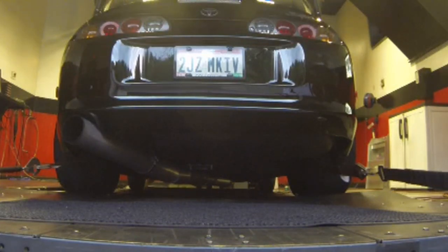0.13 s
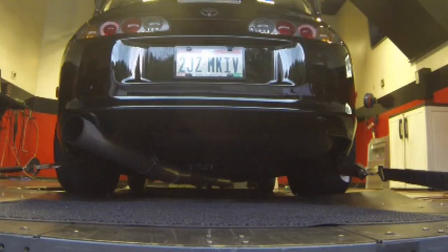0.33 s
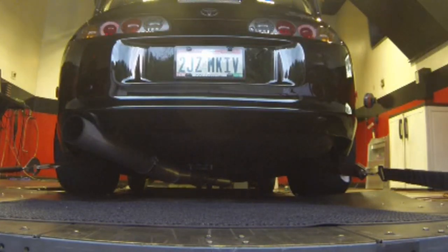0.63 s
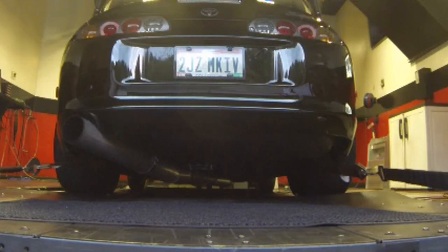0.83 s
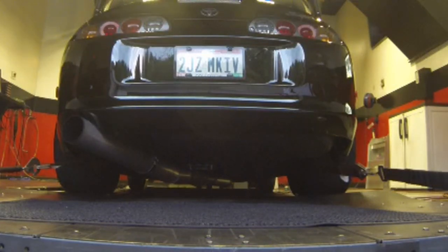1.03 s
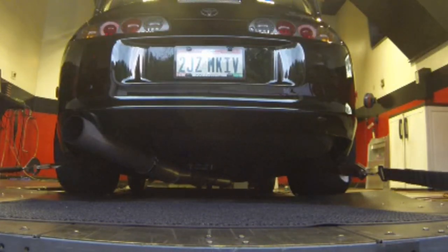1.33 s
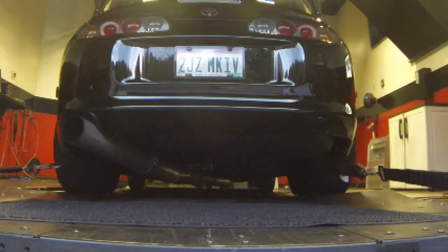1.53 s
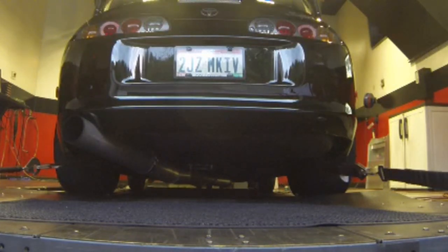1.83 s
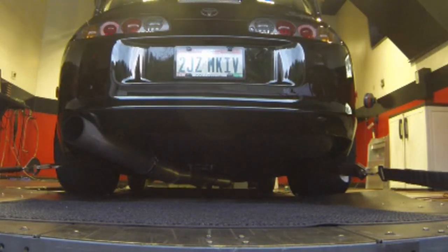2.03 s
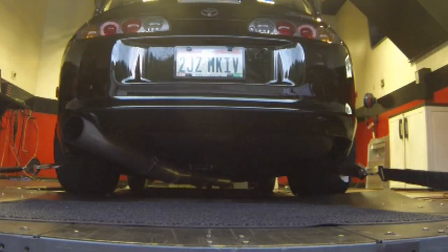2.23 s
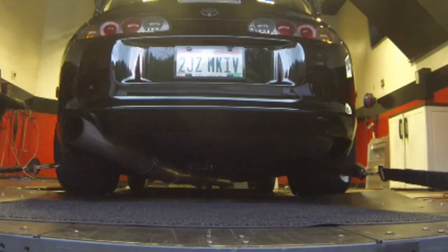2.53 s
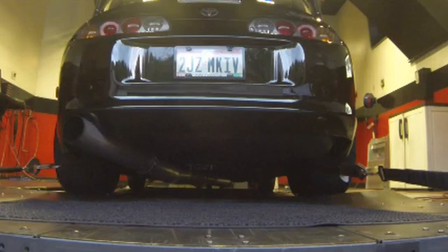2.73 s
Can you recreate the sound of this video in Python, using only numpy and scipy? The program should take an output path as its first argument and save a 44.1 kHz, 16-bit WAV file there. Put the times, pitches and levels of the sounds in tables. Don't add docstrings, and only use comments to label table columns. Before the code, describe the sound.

A tuned car engine, miked close behind its tailpipe in an echoing workshop, lopes in a deep, uneven burble with soft thumps and pops until about 1 s. It climbs from 1.2 to 1.6 s, holds a hum, stumbles near 1.9, then surges from 2.05. Sharp backfires crackle at 2.3-2.45 s before a rasping, hissing, overloaded scream lasts to the end. Rollers rumble and a fan hums faintly.

```python
import sys
import numpy as np
from scipy import signal
from scipy.fft import rfft, irfft, next_fast_len
from scipy.io import wavfile

SR = 44100
rng = np.random.default_rng(int(sys.argv[2]) if len(sys.argv) > 2 else 0)


def gain_from_decibels(decibels):
    exponent = np.asarray(decibels, float) / 20
    return 10 ** exponent


def bounce(signal):
    frames = np.transpose(np.atleast_2d(signal))
    limited = np.clip(frames, -1, 1)
    pcm = np.round(limited * 32767).astype(np.int16)
    wavfile.write(sys.argv[1], SR, pcm)


N = 127890

# t/s, firings per second f/Hz
FIRING_RATE = [(0.0, 58.1), (.35, 59.8), (.7, 59.7), (.9, 65), (1.2, 72.8), (1.298, 83.7), (1.398, 114.5),
               (1.468, 130.5), (1.55, 139), (1.61, 149.5), (1.76, 150), (1.82, 144.5), (1.96, 143.5),
               (2.05, 155), (2.26, 248), (2.39, 264), (2.5, 240.4), (2.9, 238.1)]
# f/Hz, level/dB
GAS_COLOUR = [(300, -7.5), (500, -1.5), (1000, -12.5), (1400, -13.5), (3100, -22.5), (6000, -41.5),
              (10000, -53), (15500, -95.5)]


def rms_one(x):
    return x / np.sqrt(np.mean(x ** 2) + 1e-20)


def in_time(rows):
    s, *columns = np.transpose(rows)
    return [np.interp(np.arange(N) / SR, s, column) for column in columns]


def bump(s, length):
    return np.exp(-((np.arange(N) / SR - s) / length) ** 2)


def clicks(rows):
    out = np.zeros(N)
    for s, db in rows:
        out[int(s * SR)] = gain_from_decibels(db)
    return out


def drift(rate):
    r = np.exp(-80 * np.pi * rate / SR)
    noise = rng.standard_normal(N // 40 + 2002)
    slow = signal.lfilter([1], [1, -2 * r, r * r], noise)[2000:]
    return np.interp(np.arange(N) / 40, np.arange(len(slow)), rms_one(slow - slow.mean()))


def resonate(x, peaks):
    out = 0
    for k, (hz, width, db) in enumerate(peaks):
        r = np.exp(-np.pi * width / SR)
        drive = np.array([1, 0, -1]) * (1 - r * r) / 2
        ringing = [1, -2 * r * np.cos(2 * np.pi * hz / SR), r * r]
        out = out + (-1) ** k * gain_from_decibels(db) * signal.lfilter(drive, ringing, x + 1e-18)
    return out


def banded(spectrum, patchy_db, tilt_db=0):
    out, together = 0, drift(8.0)
    edges = 22 * 2 ** np.arange(0, 9.6, .5)
    white = rng.standard_normal((2, N))
    f, d = np.transpose(spectrum)
    for k, (low, high) in enumerate(zip(edges, edges[1:])):
        hz = np.sqrt(low * high)
        db = np.interp(np.log(hz), np.log(f), d, left=-60, right=-90)
        sos = signal.butter(2, [low, high], "band", fs=SR, output="sos")
        band = signal.sosfilt(sos, white[k % 2])
        flicker_db = patchy_db * (together + 0.53 * drift(17.0))
        out = out + band * gain_from_decibels(db + tilt_db * np.log2(hz / 2000) + flicker_db)
    return rms_one(out)


def firing():
    # t/s, spread of strength level/dB, spread of timing/cycles
    unevenness = [(0, 1, .005), (.55, 1.4, .008), (.65, 3.5, .04), (.9, 3, .035), (1.05, 2.5, .02),
                  (1.3, 1.2, .012), (1.45, .8, .014), (1.6, .4, .018), (1.75, 1, .02), (1.88, 3, .035),
                  (1.96, .6, .005), (2.06, .6, .008), (2.12, 1.5, .014), (2.25, 1.3, .012), (2.3, 2, .12),
                  (2.34, 7, .25), (2.43, 6, .2), (2.47, 1.3, .008), (2.9, .7, .004)]
    cylinder_levels = [0, .5, -.3, -.6, .2, .4]
    # t/s, level/dB between neighbours
    alternation = [(0, -0.5), (1.72, -1.5), (1.85, 2.5), (1.94, 1.5), (1.98, -1), (2.9, 2)]
    spread_db, late = in_time(unevenness)
    turn = 1 - 0.2086 + np.cumsum(in_time(FIRING_RATE)[0]) / SR
    chance = rng.standard_normal((int(turn[-1]) + 3, 2))
    number = np.arange(len(chance))
    turn = turn + late * np.interp(turn, number, chance[:, 0])
    cylinder_db = np.interp(turn, number, np.resize(cylinder_levels, len(chance)))
    alternate_db = in_time(alternation)[0] * np.cos(np.pi * turn)
    chance_db = spread_db * np.interp(turn, number, chance[:, 1])
    return turn, gain_from_decibels(cylinder_db + alternate_db + chance_db)


def pulses(turn, strength, sharp):
    mean = np.i0(sharp)
    spread = np.sqrt(np.i0(2 * sharp) - mean ** 2)
    return -(strength * np.exp(sharp * np.cos(2 * np.pi * turn)) - mean) / spread


def push(turn, strength):
    # t/s, level/dB, sharpness (no unit)
    push_curve = [(0, -16.5, 3.8), (.35, -21, 8.6), (.62, -17.5, 5.8), (.82, -17.5, 5.2), (1.0, -15.5, 2.2),
                  (1.2, -11, 8.8), (1.32, -12, 1), (1.42, -15.5, 7.7), (1.56, -14.5, 1.8), (1.7, -18, 5.5),
                  (1.8, -21.5, 1.4), (1.97, -11.5, 2.2), (2.07, -14.5, 6.7), (2.15, -14, 21.4),
                  (2.25, -17.5, 2.8), (2.31, -20, 1.7), (2.5, -29, 9.6), (2.9, -21.5, 8)]
    db, sharp = in_time(push_curve)
    return gain_from_decibels(db) * pulses(turn, strength, np.clip(sharp, .2, 40))


def crack(turn, strength):
    # t/s, muffler level/dB, pipe level/dB
    ring_curve = [(0, -6.5, -51), (.14, -11, -61), (.26, -11.5, -55.5), (.37, -17, -47), (.48, -10.5, -36),
                  (.6, -16, -32), (.8, -18.5, -77), (1.0, -17.5, -35.5), (1.3, -33.5, -29),
                  (1.48, -28, -28), (1.65, -5, -25.5), (1.85, -18.5, -26.5), (2.0, -40, -24.5),
                  (2.2, -27, -21.5), (2.3, -38, -22), (2.45, -8.5, -23.5), (2.55, -36, -10),
                  (2.9, -53, -10)]
    # f/Hz, width/Hz, level/dB
    muffler_peaks = [(166.7, 23.5, -1), (240.7, 18.6, 2.5), (299.8, 4.3, -3), (370, 17.7, -7.5),
                     (538, 66, -19), (1078, 8, -2)]
    # f/Hz, width/Hz, level/dB
    pipe_peaks = [(480, 90, -2), (720, 90, 2), (960, 90, 0), (1430, 60, -10), (1680, 60, -9), (1912, 80, 1)]
    # t/s, f/Hz, level/dB, length/s
    chamber_booms = [(0.047, 171, -10, 0.059), (0.142, 289, -8.5, 0.034), (0.262, 177, -13, 0.095),
                     (0.302, 298, -11.5, 0.056), (0.54, 289, -21.5, 0.039), (0.752, 300, -13, 0.036),
                     (0.978, 334, -11.5, 0.056), (1.19, 297, -16.5, 0.062), (1.42, 341, -9.5, 0.027),
                     (1.495, 387, -8.5, 0.048), (1.662, 1053, -17, 0.04), (1.953, 564, -13.5, 0.073),
                     (2.143, 930, -10, 0.014)]
    muffler_db, pipe_db = in_time(ring_curve)
    crack_hz, boom_width_hz, throb_db = 1300, 23.7, 1.2
    sharp = np.minimum((crack_hz / in_time(FIRING_RATE)[0]) ** 2, 150)
    edge = pulses(turn, strength, sharp)
    muffler = gain_from_decibels(muffler_db + 1.5 + throb_db * drift(4.8)) * resonate(edge, muffler_peaks)
    pipe = gain_from_decibels(pipe_db + 3.5) * resonate(edge, pipe_peaks)
    booms = 0
    for s, hz, db, length in chamber_booms:
        booms = booms + bump(s, length) * resonate(edge, [(hz, boom_width_hz, db)])
    return muffler + pipe + booms


def stumble():
    # t/s, level/dB, length/s
    weak_burns = [(0.187, -5.5, .015), (0.382, -12, 0.018), (0.611, -7.5, 0.016), (0.647, -0.5, .015),
                  (.77, 1, .02), (0.817, -6, 0.024), (1.033, 1.5, .015), (1.14, -10, 0.017),
                  (1.23, -4, 0.014), (1.448, -1, .012), (1.552, 0, 0.0068), (1.8, 1, 0.017),
                  (2.117, -0.5, 0.014), (2.289, -5, 0.021)]
    return gain_from_decibels(sum(db * bump(s, length) for s, db, length in weak_burns))


def flow():
    # t/s, level/dB
    flow_curve = [(0, -38.5), (.07, -36.5), (.85, -38.5), (1.2, -38.5), (1.3, -35.5), (1.39, -29),
                  (1.46, -34.5), (1.55, -42.5), (1.74, -41), (1.9, -31.5), (1.99, -42), (2.06, -37.5),
                  (2.12, -26.5), (2.3, -28), (2.34, -28.5), (2.46, -15.5), (2.52, -21.5), (2.9, -19.5)]
    # t/s, level/dB
    lope_swells = [(0.112, 1.5), (.33, 6), (0.501, 6.5), (.7, 3), (0.932, 3.5), (1.084, 1), (1.941, 3.5),
                   (2.371, 11), (2.4, -3), (2.433, 5), (2.601, 1), (2.752, 2.5)]
    return in_time(flow_curve)[0] + sum(db * bump(s, 0.031) for s, db in lope_swells)


def blowdown(turn, strength):
    # f/Hz, width/Hz, level/dB
    hiss_peaks = [(917, 131, 0.5), (1804, 243, 5), (3184, 293, -3), (4950, 310, 2.5), (9140, 310, 0.5)]
    flow_db = flow()
    brighten_db = 0.006 * (flow_db - flow_db.mean())
    noise = banded(GAS_COLOUR, 1, brighten_db)
    noise = noise * strength ** .25 * (1 + .25 * np.cos(2 * np.pi * turn - .8))
    return gain_from_decibels(flow_db + 2) * (noise + gain_from_decibels(7.5) * resonate(noise, hiss_peaks))


def bangs():
    # t/s, level/dB
    bang_events = [(.055, -28), (.258, -9.5), (.344, -26), (.545, -15), (.68, -10), (.744, -19),
                   (.795, -26), (1.05, -24), (1.152, -14.5), (1.207, -23), (1.273, -14), (1.32, -12),
                   (1.37, -7), (1.527, -8.5), (1.919, -6), (2.3115, 4), (2.3325, 8), (2.3365, -10),
                   (2.357, 3), (2.3605, 3.5), (2.364, 0), (2.418, 8), (2.432, 3)]
    bang_s, tail_s, tail_db, top_hz = .0013, .008, -20, 2500
    start = clicks(bang_events)
    ramp = np.linspace(-1, 1, int(bang_s * SR) + 2)
    jolt = np.convolve(start, ramp * np.hanning(len(ramp) + 2)[1:-1] * 3)[:N]
    fade = signal.lfilter([1], [1, -np.exp(-1 / (tail_s * SR))], start)
    tail = fade * banded(GAS_COLOUR, 0.8, 4)
    dull = signal.butter(2, top_hz, fs=SR, output="sos")
    return gain_from_decibels(-2) * signal.sosfilt(dull, jolt + gain_from_decibels(tail_db) * tail)


def thumps():
    # t/s, level/dB
    thump_events = [(.344, -8), (.409, -5), (.609, -1), (.692, -6), (.712, -7), (.792, -1), (.994, -6),
                    (1.097, -8), (1.206, -8), (2.326, -7)]
    thump_hz, t60_s = 120, .02
    thump = resonate(clicks(thump_events), [(thump_hz, 2.2 / t60_s, 0)])
    thump = resonate(thump, [(1.4 * thump_hz, 150, 0)])
    loudest_db = max(db for _, db in thump_events)
    return -thump / np.abs(thump).max() * gain_from_decibels(loudest_db - 3)


def ticks():
    # t/s, peak level/dB
    tick_events = [(.0747, -41), (.262, -44), (.463, -42), (.681, -35), (.796, -39), (1.0415, -41.5),
                   (1.27, -41), (1.353, -35), (2.12, -41.5), (2.3115, -29.5), (2.322, -28.5), (2.3325, -25),
                   (2.3365, -25), (2.357, -20.5), (2.3605, -28.5), (2.364, -20.5), (2.395, -23.5),
                   (2.418, -17), (2.43, -19.5), (2.435, -21), (2.449, -23), (2.57, -26.5), (2.6, -26.5),
                   (2.669, -27), (2.7443, -26), (2.755, -25.5)]
    fade_s, low_hz, top_hz = .002, 2800, 7500
    fade = signal.lfilter([1], [1, -np.exp(-1 / (fade_s * SR))], clicks(tick_events))
    puff = fade * rng.standard_normal(N)
    puff = signal.sosfilt(signal.butter(2, low_hz, "high", fs=SR, output="sos"), puff)
    return gain_from_decibels(-1) * signal.sosfilt(signal.butter(3, top_hz, fs=SR, output="sos"), puff)


def lurches():
    # t/s, f/Hz, level/dB, length/s
    lurch_events = [(0.162, 85, -13, 0.015), (0.359, 80, -14, 0.017), (.6, 85, -17, 0.016),
                    (.708, 88, -15, 0.026), (0.796, 95, -15, 0.012), (.96, 85, -16.5, 0.027),
                    (2.144, 60, -22, 0.027), (2.333, 60, -15, 0.015)]
    t, out = np.arange(N) / SR, 0
    for s, hz, db, length in lurch_events:
        out = out + 1.53 * gain_from_decibels(db) * bump(s, length) * np.cos(2 * np.pi * hz * (t - s))
    return out


def low_flutter():
    # f/Hz, level/dB
    flutter_colour = [(22, 8.5), (32, -6), (45, -9.5), (90, -34.5)]
    return gain_from_decibels(flow() - 5) * banded(flutter_colour, patchy_db=3)


def rollers():
    # f/Hz, level/dB
    rumble_colour = [(25, -25), (50, -21), (64, -7.5), (88, 2), (140, -14), (300, -10.5), (600, -28.5)]
    # t/s, level/dB
    rumble_curve = [(0, -31.5), (.15, -18.5), (.6, -20), (.85, -23), (1.2, -24.5), (1.38, -44.5),
                    (1.62, -45), (1.7, -28.5), (1.92, -14.5), (1.99, -37), (2.05, -41), (2.11, -26),
                    (2.33, -22), (2.9, -21)]
    return gain_from_decibels(in_time(rumble_curve)[0]) * banded(rumble_colour, patchy_db=1.2)


def fan():
    # t/s, level/dB
    fan_curve = [(0, -6), (.65, -5), (.8, -1), (1.0, -2), (1.1, -8), (1.5, -6), (1.6, 1), (1.9, 1),
                 (2.0, -6), (2.35, -8), (2.9, -14)]
    level_db = -29.5 + in_time(fan_curve)[0] + 2.6 * drift(6.8)
    hz = 388.5 + 1.1 * drift(5.9)
    return gain_from_decibels(level_db) * np.sin(2 * np.pi * np.cumsum(hz) / SR)


def shop(x):
    t60_s, wall_cut_hz = .4, 3500
    size = next_fast_len(N + SR)
    hz = np.arange(size // 2 + 1) * SR / size
    dull, walls = 1 / (1 + 1j * hz / wall_cut_hz), 0
    for k, lag in enumerate(rng.uniform(.02, .055, 10)):
        loop = gain_from_decibels(-60 * lag / t60_s) * dull * np.exp(-2j * np.pi * hz * lag)
        walls = walls + (-1) ** k * loop / (1 - loop)
    return irfft(rfft(x, size) * walls, size)[:N]


def scene():
    turn, strength = firing()
    pipe = stumble() * (push(turn, strength) + crack(turn, strength))
    pipe = pipe + blowdown(turn, strength) + bangs() + thumps()
    echo = gain_from_decibels(-18) * shop(pipe)
    return (pipe + echo + ticks() + lurches() + low_flutter() + rollers() + fan())[None]


def top_cut(x):
    return signal.sosfilt(signal.butter(12, 15710, fs=SR, output="sos"), x)


def record(dry):
    # t/s, peak (full scale = 1)
    ceiling_curve = [(0, .9), (2.3, .85), (2.345, .7), (2.365, .4), (2.9, .45)]
    # f/Hz, width/Hz, share taken away level/dB
    housing_dip = [(2260, 450, -5.5)]
    bass_cut_hz, sag_hz = 64, 40
    top = in_time(ceiling_curve)[0]
    x = signal.sosfilt(signal.butter(4, bass_cut_hz, "high", fs=SR, output="sos"), dry) / top
    bias = 0.29 * (1 - top)
    pushed = x + bias
    x = top * (pushed / (1 + pushed ** 4) ** 0.32 - bias)
    x = signal.sosfilt(signal.butter(1, sag_hz, "high", fs=SR, output="sos"), x)
    return top_cut(x - resonate(x, housing_dip))


dry = scene()
out = record(dry)
bounce(out)
```